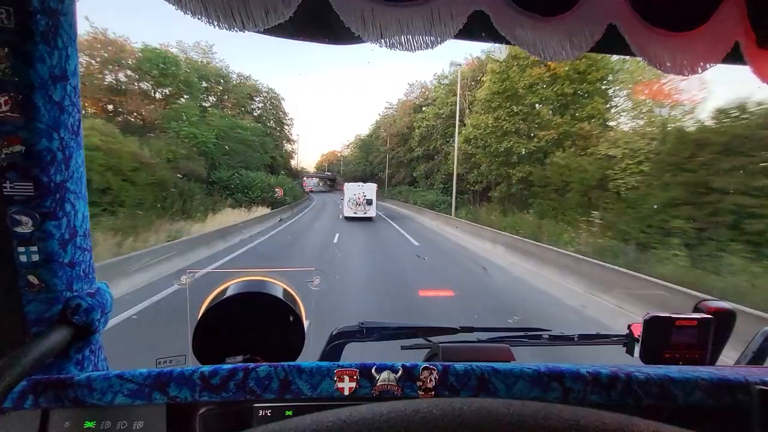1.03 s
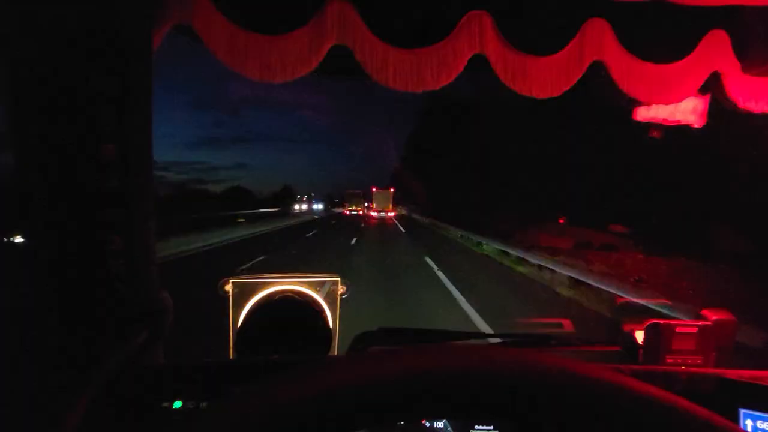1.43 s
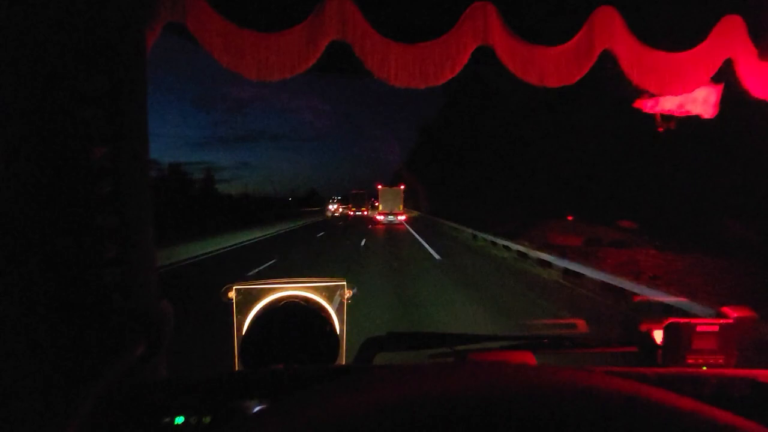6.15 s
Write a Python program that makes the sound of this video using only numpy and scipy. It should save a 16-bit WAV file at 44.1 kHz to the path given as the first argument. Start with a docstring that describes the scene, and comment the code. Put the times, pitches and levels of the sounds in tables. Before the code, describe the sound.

A microphone in the cab picks up motorway driving. First comes a thick, wide, bass-heavy rumble, fluttering and jolting, with trim clicks and a short rising hooted note just before a hard cut. After a blink of total silence, a lighter, centred stretch follows: low engine hum, smooth tyre roar, gentle wind hiss, occasional dull bumps and barely audible ticks and scuffs.

```python
"""The cab air of a lorry at motorway speed booms near its lowest mode, around sines at the diesel's firing orders.
Banded noises make floor rumble, tyre roar, wind hiss at the glass and trim rustle, all following one road curve.
Trim ticks as short decaying modes under a noise crack, scuffs as grainy noise; the dashboard hoots once.
A heavy stereo stretch stops dead; after a short silence a lighter, almost mono stretch follows."""
import sys
import numpy as np
from scipy import signal
from scipy.fft import rfft, irfft, next_fast_len
from scipy.io import wavfile
from scipy.ndimage import uniform_filter1d, map_coordinates

SR = 44100
rng = np.random.default_rng(int(sys.argv[2]) if len(sys.argv) > 2 else 0)


def volts_from_decibels(level):
    """Turn decibel levels (scalar or array-like) into linear amplitude factors."""
    exponent = np.asarray(level, float) / 20
    return 10 ** exponent


def transcribe(u):
    """Save the signal u as a 16-bit wav file named by the first command-line argument.

    u: samples, shape (n,) or (channels, n), limited to [-1, 1]; the rate is SR.
    q: integer samples, one column per channel.
    """
    v = np.clip(np.atleast_2d(u).T, -1, 1)
    q = np.round(v * 32767).astype(np.int16)
    wavfile.write(sys.argv[1], SR, q)


N = 328881
T = np.arange(N) / SR

# The two stretches. Each row: start in seconds, end in seconds.
SPANS_S = [(0, 1.4005), (1.4972, 7.46)]
# Cab-air boom, one list per stretch. Each row: time in seconds, centre pitch in Hz, level in dB.
BOOM = [
    [(0, 66.8, -30.5), (.09, 64, -23), (.23, 72, -35.5), (.32, 72.1, -23), (.52, 64, -24.5),
     (.66, 81.6, -31.5), (.78, 78.5, -22), (.92, 90.5, -34.5), (1.1, 80.5, -26), (1.24, 72, -30),
     (1.34, 88, -25), (1.4, 81.6, -24)],
    [(1.5, 74.2, -36), (1.84, 76.4, -35.5), (2.42, 75, -39), (2.75, 81.4, -37.5), (2.95, 89.8, -43.5),
     (3.2, 67.3, -43.5), (3.35, 67.6, -38.5), (3.62, 90, -49), (4, 56.2, -41.5), (4.35, 72.7, -40),
     (4.6, 66.7, -38), (4.92, 84.8, -36.5), (5.04, 74.6, -41), (5.2, 80.5, -32.5), (5.35, 73.9, -40),
     (5.6, 65, -37.5), (5.82, 64, -41), (6.0, 73, -37), (6.09, 73, -43), (6.3, 65.8, -31.5), (6.5, 68, -44),
     (7.0, 69.8, -32), (7.14, 59.8, -45), (7.3, 68.4, -37), (7.46, 79.5, -48)],
]
# Engine, one row per stretch: centre firing rate in Hz, level in dB before load.
ENGINE = [(60.7, -47), (54.42, -45.5)]
# Engine orders. Each row: multiple of the firing rate, relative level in dB.
ORDERS = [(1, -9), (2, 0), (3, -7), (4, -10), (6, -10)]
# Engine load. Each row: time in seconds, change of all orders in dB.
LOAD_DB = [(0, 6.5), (3.1, 0), (3.4, 7), (4.1, 5), (4.4, -10), (7.46, 4.5)]
# Road and air strength, one list per stretch. Each row: time in seconds, level of the wind hiss in dB.
ROAD_DB = [
    [(0, -55), (.22, -55.5), (.32, -53.5), (1.1, -53), (1.38, -52)],
    [(1.5, -56.5), (1.85, -59), (2.05, -56.5), (2.2, -58.5), (2.35, -57), (2.75, -58), (2.97, -61.5),
     (3.15, -57), (3.6, -61.5), (4.0, -57.5), (4.4, -59), (4.55, -60), (5.0, -60), (5.14, -57.5),
     (5.4, -60), (5.7, -58.5), (5.95, -61.5), (6.1, -58.5), (6.4, -57), (7.1, -63), (7.3, -58.5),
     (7.46, -59)],
]
# Levels at mean road strength, one row per stretch: rumble in dB, tyre roar in dB, trim rustle in dB.
FOLLOW_DB = [(-31.5, -36.5, -65), (-39.5, -40, -71)]
# Gain per dB of road, one row per stretch: rumble in dB/dB, roar in dB/dB, rustle in dB/dB.
GROWTH = [(1.24, 0.9, 0.6), (0.38, 0.61, 1)]
# Chassis jolts. Each row: middle in seconds, 1/e half-width in seconds, lift of the rumble in dB.
BUMPS = [(0.082, 0.054, 1.5), (0.56, .06, 0), (0.858, 0.11, 3), (1.228, 0.15, 3), (3.23, .06, 5),
         (4.334, 0.03, 5.5), (5.137, 0.067, 5.5), (5.655, 0.03, 2), (6.23, 0.065, 2), (6.328, 0.021, 0.5),
         (6.86, 0.083, 7.5)]
# Scale of random level drift: rumble in dB, roar in dB.
DRIFT_DB = (1.5, 0.38)
# Noise colours before band edges, one list per stretch. Each row: frequency in Hz, relative density in dB.
RUMBLE_COLOUR = [
    [(12, -38), (20, -22), (50, 1), (70, 3), (144, -7.5), (166, -13), (189, -20), (236, -17), (300, -33.5),
     (390, -53.5), (660, -120)],
    [(12, -71), (20, -34.5), (27, -30), (41, -22.5), (65, -8), (155, -5.5), (182, -8.5), (211, -4.5),
     (274, -6), (300, 3), (390, -37), (660, -120)],
]
ROAR_COLOUR = [
    [(76, -26.5), (130, -19), (162, -26), (188, -11.5), (237, -17), (308, -12), (364, -14), (458, -20.5),
     (542, -16.5), (635, -16), (759, -25.5), (936, -26.5), (1070, -30), (1200, -30), (1600, -41),
     (2080, -74), (3520, -120)],
    [(76, -40), (130, -20), (155, -21.5), (184, -16.5), (211, -9), (274, -14.5), (364, -0.5), (384, -7.5),
     (404, -9), (435, -12), (537, -11), (628, -14), (691, -9.5), (870, -19), (1600, -30), (2080, -53),
     (3520, -120)],
]
HISS_COLOUR = [
    [(470, -37.5), (800, -6), (941, -1), (1610, -7), (1800, -8.5), (2780, -12), (3570, -16), (3940, -19),
     (5120, -25), (6170, -28), (7910, -31.5), (9420, -40.5), (10800, -48), (11900, -43.5), (15700, -48.5)],
    [(470, -36), (800, -14.5), (1120, -20), (1220, -27), (1350, -4), (1820, -9.5), (2490, -13.5),
     (2750, -15.5), (3000, -15), (4630, -34), (6730, -42), (8320, -51), (12500, -52.5), (15100, -48),
     (15700, -49)],
]
# Microphone hiss: level in dB for each stretch.
SELF_DB = (-76.5, -77)
# Trim ticks. Each row: start in seconds, level in dB, pitch of strongest ringing in Hz, spread in octaves,
# crack peak in dB relative to that level.
TICKS = [(0.3118, -39, 7200, 0.33, -8), (.577, -52, 4630, .2, -12), (0.8630, -43, 3700, .5, -8),
         (.898, -62, 10800, .15, 4), (1.3580, -46, 2700, .5, -3), (3.1866, -65.5, 6300, .4, -6),
         (4.211, -58, 6360, .4, -4), (6.338, -62, 6000, .5, -2), (6.4894, -66, 8000, 0.45, -1)]
# Trim modes. Each row: frequency in Hz, t60 in seconds.
TRIM_MODES = [(2600, .02), (3680, .035), (4700, .018), (5400, .024), (6250, .016), (8050, .014),
              (9400, .012), (12300, .018)]
# Cloth and trim scuffs, brief hiss swells. Each row: middle in seconds, half-length in seconds,
# level in dB before grain and fade, low edge in Hz, high edge in Hz.
SCUFFS = [(.005, 0.018, -46.5, 2014, 6940), (0.295, 0.018, -60, 2946, 9400),
          (0.948, 0.016, -64, 3500, 6450), (1.339, .2, -58, 2250, 3000), (4.447, .025, -63, 1400, 3800),
          (4.557, 0.032, -73, 4600, 6000), (4.668, 0.03, -68.5, 1600, 6000),
          (5.133, 0.063, -75, 3000, 6450), (5.698, 0.048, -74, 3000, 6450), (5.888, 0.046, -73, 4000, 6900),
          (6.264, 0.035, -70, 3500, 8500), (6.35, .16, -73, 3500, 7000), (6.443, 0.055, -71, 3000, 10500),
          (6.38, .14, -80, 13100, 15700)]
# Dashboard hoot: start in seconds, length in seconds.
HOOT_SPAN_S = (1.1, .08)
# Dashboard hoot: start pitch in Hz, rise in Hz, level in dB.
HOOT = (535, 50, -31)
# Stereo width, one list per stretch. Each row: frequency in Hz, gain of the unshared sound in dB.
APART_DB = [
    [(60, -21), (130, -26.5), (290, -24.5), (640, -4.5), (1410, -2), (3100, 2), (6820, -4), (15000, -3)],
    [(1000, -77), (1800, -31), (2600, -35), (3300, -52), (4200, -11.5), (6800, -7), (7600, -13),
     (8800, -17), (9500, -10), (10500, -17), (12500, -20), (13500, -8), (16000, -4)],
]
# Stereo lean, one list per stretch. Each row: frequency in Hz, left minus right in dB.
LEAN_DB = [
    [(60, 4.0), (150, 4.0), (380, 1), (950, 2.5), (2380, -3.5), (5980, -1.5), (15000, 0.5)],
    [(3000, 0), (4400, -2.5), (8000, -4.5), (15000, -3.5)],
]
# Lead of the left microphone: seconds for each stretch.
LEAD_S = (.00038, 0)


def unit(x):
    """Scaled to rms 1."""
    return x / np.sqrt(np.mean(x ** 2) + 1e-20)


def along(points, hz):
    """(Hz, value) points read on a log frequency axis."""
    f, v = np.transpose(points)
    return np.interp(np.log(hz + 1), np.log(f + 1), v)


def curves(rows):
    """One value per sample for each column after the time."""
    s, *cols = np.transpose(rows)
    return [np.interp(T, s, c) for c in cols]


def wobble(rate_hz):
    """Smooth random curve with rate_hz knots a second."""
    return map_coordinates(rng.standard_normal(int(N * rate_hz / SR) + 4), [T * rate_hz])


def filtered(x, response):
    """x times a response of frequency."""
    m = next_fast_len(N + 8192)
    return irfft(rfft(x, m) * response(np.fft.rfftfreq(m, 1 / SR)), m)[..., :N]


def band_passed(x, low_hz, high_hz):
    """Butterworth band of x."""
    sos = signal.butter(4, [low_hz, high_hz], "band", fs=SR, output="sos")
    return signal.sosfilt(sos, x)


def rush(colour, low_hz, high_hz, patchy_db, even):
    """Two unrelated noises in a soft-edged band, patchy in time and pitch; even (0-1) irons out swells."""
    z = signal.stft(rng.standard_normal((2, N)), nperseg=512)[2]
    field = uniform_filter1d(rng.standard_normal(z.shape[1:]), size=8, axis=0)
    field = uniform_filter1d(field, size=12, axis=1)
    pair = signal.istft(z * volts_from_decibels(patchy_db * unit(field)), nperseg=512)[1][:, :N]

    def response(hz):
        below = 1 / (1 + (hz / high_hz) ** 8)
        above = 1 / (1 + (low_hz / (hz + 1)) ** 8)
        return volts_from_decibels(along(colour, hz)) * np.sqrt(below * above)

    pair = filtered(pair, response)
    power = np.abs(uniform_filter1d(pair ** 2, size=SR // 16, axis=1)) + 1e-20
    return unit(pair / power ** (even / 2))


def cab_boom(k):
    """Cab air sings near its lowest mode, unsteady in pitch, over low noise that shares its level."""
    boom_hz, boom_db = curves(BOOM[k])
    phase = 2 * np.pi * np.cumsum(boom_hz + 7 * wobble(10)) / SR
    # a trough at the edge of the silence makes it click
    phase -= phase[round(SPANS_S[k][1 - k] * SR)]
    boom = -np.sqrt(2) * np.cos(phase) * volts_from_decibels(2.7 * wobble(14))
    shake = rush(RUMBLE_COLOUR[k], 10, 76.7, patchy_db=0.0, even=0.47)
    return volts_from_decibels(boom_db) * (volts_from_decibels(-3.0) * boom * [[1], [0]] + volts_from_decibels(-1.0) * shake)


def diesel(k):
    """Sines at multiples of a wandering firing rate, their level set by load."""
    firing_hz, level_db = ENGINE[k]
    level_db = level_db + curves(LOAD_DB)[0]
    phase = 2 * np.pi * np.cumsum(firing_hz + 0.304 * wobble(1.535)) / SR
    tone = np.zeros(N)
    for multiple, order_db in ORDERS:
        gain = volts_from_decibels(level_db + order_db + 1.5 * wobble(1.2))
        tone += gain * np.sin(multiple * phase + rng.uniform(0, 7))
    return tone * [[1], [0]]


def jolts_db():
    """Bumps lift the chassis level in Gaussian pulses."""
    return sum(lift_db * np.exp(-((T - s) / width_s) ** 2) for s, width_s, lift_db in BUMPS)


def floor_rumble(k, rumble_db, jolt_db):
    """Low noise of the chassis, lifted by jolts."""
    level_db = rumble_db + jolt_db + DRIFT_DB[0] * wobble(9)
    return volts_from_decibels(level_db) * rush(RUMBLE_COLOUR[k], 107.3, 207.3, patchy_db=0.2, even=0.55)


def tyre_roar(k, roar_db, jolt_db, texture):
    """Mid-band tyre noise; 0.13 of each jolt's dB reaches it."""
    level_db = roar_db + 0.13 * jolt_db + DRIFT_DB[1] * wobble(5.8) + 0.078 * texture
    return volts_from_decibels(level_db) * rush(ROAR_COLOUR[k], 213, 1445, patchy_db=-1.35, even=0.62)


def wind_hiss(k, hiss_db, texture):
    """Noise of wind at the glass, flickering fast."""
    level_db = hiss_db + 0.95 * texture + 0.33 * wobble(35)
    return volts_from_decibels(level_db) * rush(HISS_COLOUR[k], 1730, 3260, patchy_db=0.9, even=0)


def trim_rustle(k, rustle_db, texture):
    """Treble noise of shaken trim, flickering fast."""
    level_db = rustle_db + 0.34 * texture + 1.2 * wobble(30)
    return volts_from_decibels(level_db) * rush(HISS_COLOUR[k], 4430, 8000, patchy_db=1.0, even=0)


def drive(k):
    """Steady sources of stretch k as a pair of unrelated sounds, the tones in the first only."""
    hiss_db, = curves(ROAD_DB[k])
    swell_db = hiss_db - np.mean(ROAD_DB[k], axis=0)[1]
    rumble_db, roar_db, rustle_db = [db + grow * swell_db for db, grow in zip(FOLLOW_DB[k], GROWTH[k])]
    jolt_db = jolts_db()
    # road texture moves roar, hiss and rustle together
    texture = wobble(11)
    pair = cab_boom(k) + diesel(k)
    pair += floor_rumble(k, rumble_db, jolt_db)
    pair += tyre_roar(k, roar_db, jolt_db, texture)
    pair += wind_hiss(k, hiss_db, texture)
    pair += trim_rustle(k, rustle_db, texture)
    return pair + microphone_hiss(k)


def trim_ticks():
    """Plastic modes near each tick's pitch ring briefly under a bright noise crack."""
    out, t = np.zeros((2, N + SR)), np.arange(SR // 8) / SR
    for s, level_db, peak_hz, spread_oct, crack_db in TICKS:
        noise = rng.standard_normal((2, len(t))) * volts_from_decibels(-60 * t / 0.015)  # t60 in seconds
        crack = band_passed(noise, 4500, 15500)
        ring = np.zeros((2, len(t)))
        for hz, t60_s in TRIM_MODES:
            strength = np.exp(-(np.log2(hz / peak_hz) / spread_oct) ** 2)
            mode = np.sin(2 * np.pi * (hz * t + rng.random((2, 1))))
            ring += strength * volts_from_decibels(-60 * t / t60_s) * mode
        tick = ring + volts_from_decibels(crack_db) * crack / np.abs(crack).max()
        out[:, round(s * SR):][:, :len(t)] += volts_from_decibels(level_db) * tick
    return out[:, :N]


def scuffs():
    """Rubbing cloth and trim: grainy band noise under cosine-squared swells."""
    out, grain = np.zeros((2, N)), volts_from_decibels(2.2 * wobble(200))
    for s, half_s, level_db, low_hz, high_hz in SCUFFS:
        near = np.abs(T - s) < half_s
        rub = unit(band_passed(rng.standard_normal((2, SR // 2)), low_hz, high_hz))[:, :near.sum()]
        fade = np.cos(np.pi / 2 * (T[near] - s) / half_s) ** 2
        out[:, near] += volts_from_decibels(level_db) * rub * grain[near] * fade
    return out


def hoot():
    """One hollow note of the dashboard that swells, rises in pitch and fades."""
    (start_s, length_s), (hz, rise_hz, level_db) = HOOT_SPAN_S, HOOT
    u = np.clip((T - start_s) / length_s, 0, 1)
    tone = np.sin(2 * np.pi * np.cumsum(hz + rise_hz * u ** 2) / SR)
    return volts_from_decibels(level_db) * np.sin(np.pi * u ** 0.68) * tone * [[1], [0]]


def microphone_hiss(k):
    """Faint treble noise that ignores the road."""
    return volts_from_decibels(SELF_DB[k]) * rush(HISS_COLOUR[k], 8000, 20000, patchy_db=-0.5, even=0)


def wide(pair, k):
    """Left and right share the first sound, differ by the second, lean and arrive a little apart."""
    mid = pair[0]
    side = filtered(pair[1], lambda hz: volts_from_decibels(along(APART_DB[k], hz)))

    def tilt(hz):
        gain = volts_from_decibels(np.outer([.5, -.5], along(LEAN_DB[k], hz)))
        return gain * np.exp(1j * np.pi * LEAD_S[k] * np.outer([1, -1], hz))

    return filtered(np.array([mid + side, mid - side]), tilt)


def scene():
    """The wide stretch, a silent gap, the narrow stretch."""
    small = trim_ticks() + scuffs() + hoot()
    out = np.zeros((2, N))
    for k, (start_s, end_s) in enumerate(SPANS_S):
        out += wide(drive(k) + small, k) * ((T >= start_s) & (T < end_s))
    return out


def top_cut(x):
    """Nothing passes above the cut-off."""
    return signal.sosfilt(signal.butter(12, 16800, fs=SR, output="sos"), x)


def record(dry):
    """Steep band limit at 15750 Hz."""
    kept = filtered(dry, lambda hz: 1 / np.sqrt(1 + (hz / 15750) ** 200))
    return top_cut(kept)


dry = scene()
out = record(dry)
transcribe(out)
```